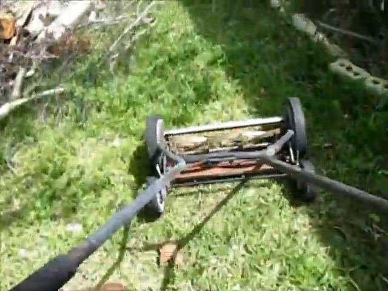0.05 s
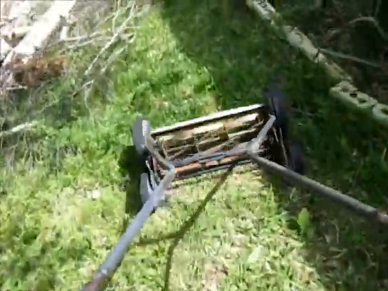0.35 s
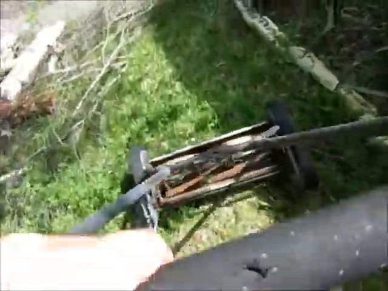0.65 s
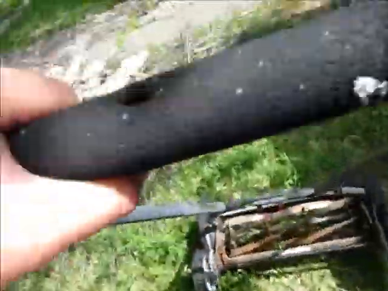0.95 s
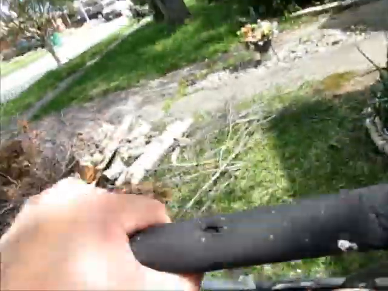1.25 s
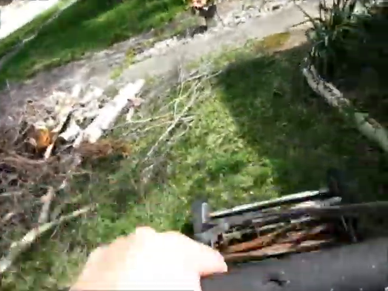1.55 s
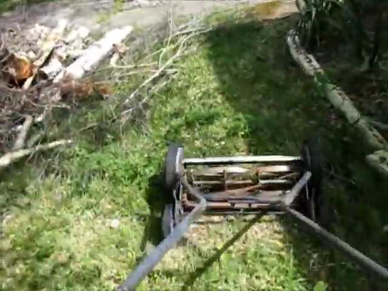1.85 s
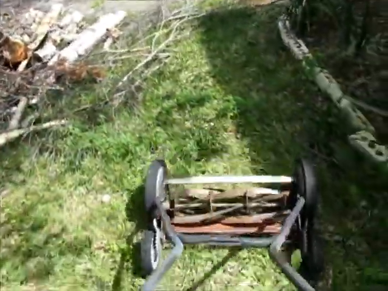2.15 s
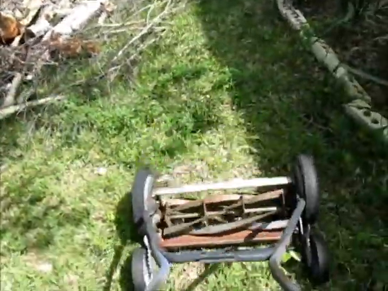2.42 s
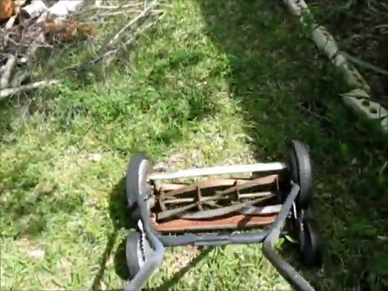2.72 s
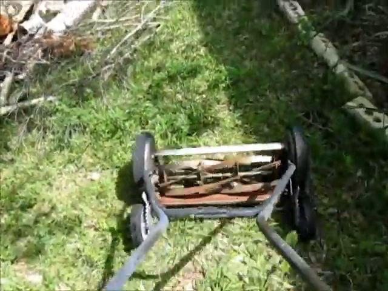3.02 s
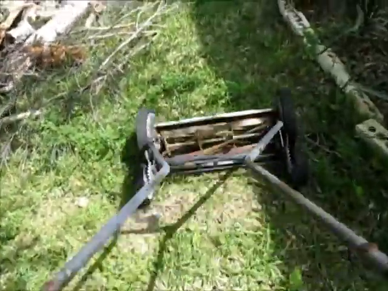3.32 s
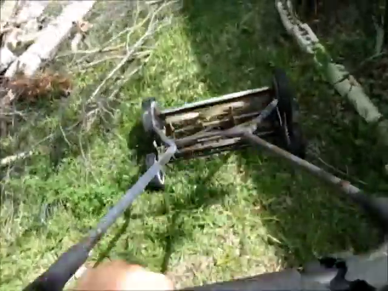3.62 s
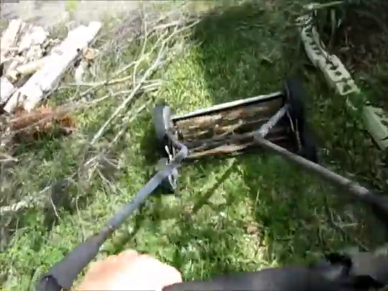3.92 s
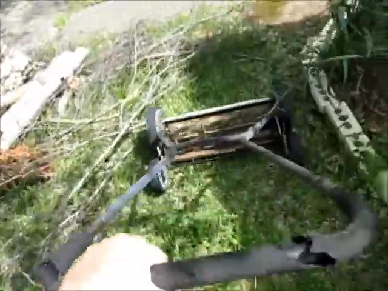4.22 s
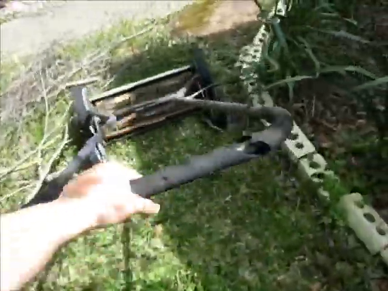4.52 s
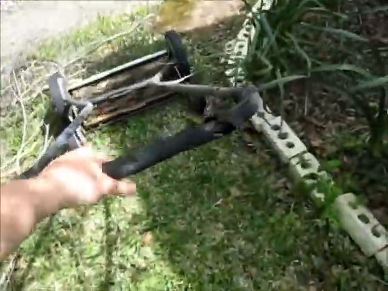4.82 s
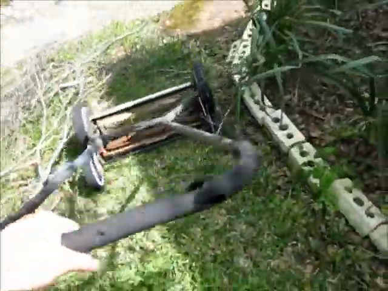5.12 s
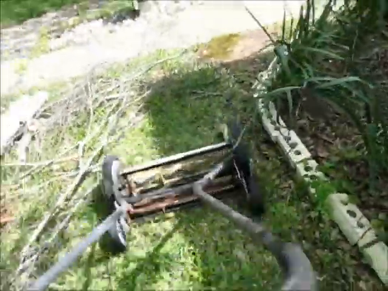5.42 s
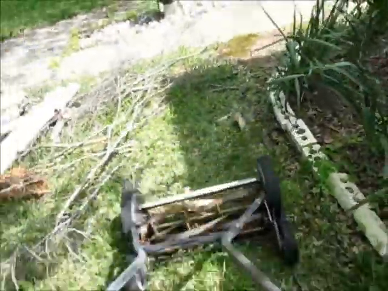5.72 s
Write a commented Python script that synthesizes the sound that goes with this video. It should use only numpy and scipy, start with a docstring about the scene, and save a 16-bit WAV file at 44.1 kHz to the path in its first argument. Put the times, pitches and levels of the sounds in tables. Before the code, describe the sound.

A hand-pushed reel mower rolls back and forth over a lawn, heard close from its handle. Its steel blades rattle and scrape, hissing through grass, while the loose handle clanks. After the first push it pauses; a faint bird whistles and a dry pivot squeaks once. More strokes follow with snapping stems and rumbling wheels, ending in quick bright metal clinks. Soft garden air and a light breeze lie underneath.

```python
"""A hand-pushed reel mower rattles and clanks back and forth over a lawn, heard from its handle.
The harder the push, the louder gears and blades rattle the steel frame and the reel hisses through grass.
The loose handle knocks, stems snap, the wheels hum over rough ground, and at speed one high blade
catches on the bed knife about once a turn. In a pause a small bird whistles, then a dry pivot squeaks.
Garden air and a light breeze lie underneath."""
import sys
import numpy as np
from scipy import signal
from scipy.fft import rfft, irfft, next_fast_len
from scipy.io import wavfile
from scipy.ndimage import map_coordinates

SR = 44100
rng = np.random.default_rng(int(sys.argv[2]) if len(sys.argv) > 2 else 0)


def store_wav(level_fs):
    """Save 16-bit WAV to argv[1]."""
    pcm = np.round(np.clip(np.atleast_2d(level_fs), -1, 1) * 32767)
    wavfile.write(sys.argv[1], SR, pcm.T.astype(np.int16))


N = 262836

# how hard the mower is pushed, stroke after stroke (time [s], effort [dB])
PUSH_EFFORT = [(0, -30.5), (0.1, -28.5), (0.38, -28), (0.5, -41.5), (0.641, -52.5), (1.15, -65.5),
               (1.42, -53.5), (1.6, -42), (1.78, -50), (1.872, -30), (1.949, -33.5), (2.28, -31.5),
               (2.55, -55), (2.7, -47.5), (3.1, -33.5), (3.34, -34.5), (3.48, -27.5), (3.85, -33),
               (4.13, -32), (4.44, -22.5), (4.61, -29.5), (4.7, -38), (4.9, -45.5), (5.2, -31),
               (5.651, -31.5), (5.96, -29)]
# modes of the steel frame and reel (frequency [Hz], level [dB], t60 [s])
FRAME_MODES = [(262, -16, 0.063), (333, -19.5, 0.052), (598, -11, 0.091), (864, -12, 0.077),
               (1013, -10.5, 0.12), (1107, -6, 0.13), (1143.6, -5.5, 0.31), (1178, -6, 0.12),
               (1306, -11.5, 0.082), (1427, -10.5, 0.054), (1930, -14, 0.06), (2445, -18.5, 0.2),
               (2890, -23.5, 0.2), (6440, -10.5, 0.054)]
# thick tufts that the reel shears (centre [s], length [s], hiss [dB])
GRASS_TUFTS = [(0.785, 0.22, -44.5), (1.53, 0.34, -50), (1.89, 0.36, -34), (2.42, 0.14, -43),
               (2.8, 0.2, -48), (3.9, 0.5, -35.5), (4.63, 0.095, -24.5), (4.98, 0.63, -43.5),
               (5.4, 1, -34.5)]
# loose handle joints striking (time [s], clash [dB], frame ring [dB], bright edge [dB], rise [s])
HANDLE_KNOCKS = [(0.339, -7, -17, -38, 0.01), (0.3704, -10.5, -29, -19, 0.0021),
                 (0.384, 1.5, -10, -13.5, 0.012), (0.4546, -9, -35, -22.5, 0.00054),
                 (0.478, -28, -27, -47, 0.0023), (0.5605, -10.5, -28, -42, 0.0043),
                 (1.5316, -16, -29, -52, 0.001), (1.5469, -8, -29, -42, 0.0027),
                 (1.5731, -32, -16.5, -55, 0.002), (1.6275, -8, -22, -33, 0.00043),
                 (1.647, -43, -19, -54, 0.002), (2.0024, -7, -24, -20.5, 0.0012),
                 (2.04, -7.5, -18.5, -19, 0.018), (2.105, -20, -21, -24.5, 0.0019),
                 (2.16, -13, -15.5, -21, 0.013), (2.2514, -10.5, -15, -34, 0.0028),
                 (2.264, -7, -15, -16, 0.0084), (2.3667, -21.5, -22, -26.5, 0.0013),
                 (2.38, -33, -18.5, -42, 0.003), (2.8351, -37, -26, -50, 0.002),
                 (2.8598, -30.5, -30, -47, 0.0012), (3.015, -17, -21, -49, 0.003),
                 (3.1762, -15.5, -19.5, -47, 0.0027), (3.2375, -5, -29, -15.5, 0.0015),
                 (3.5257, -13.5, -25, -39.5, 0.0029), (3.6228, -17, -20, -45, 0.0025),
                 (3.682, -5, -31, -20, 0.0051), (3.934, -10.5, -23, -19, 0.0082),
                 (4.29, -6.5, -15, -18.5, 0.0077), (4.3152, -27, -11.5, -39, 0.002),
                 (4.4586, -8.5, -13.5, -29.5, 0.0011), (4.4861, -18, -23.5, -17.5, 0.0034),
                 (4.562, -13.5, -15, -20.5, 0.002), (4.8321, -33, -33, -40, 0.0015),
                 (5.0897, -16.5, -19, -23.5, 0.0026)]
# the high blade catching the bed knife (time [s], level [dB])
BLADE_CATCHES = [(0.046, -19), (0.137, -14), (0.203, -15), (5.189, -8.5), (5.262, -11.5), (5.375, -9),
                 (5.436, -8), (5.532, -12.5), (5.605, -6.5), (5.686, -9.5), (5.7, -10), (5.756, -7.5),
                 (5.776, -13.5), (5.844, -8.5), (5.933, -9)]
# rough ground that sets the wheels humming (centre [s], length [s], hum [dB])
GROUND_BUMPS = [(0.2, 0.52, -37.5), (3.18, 0.19, -35.5), (3.55, 0.37, -34.5), (4.26, 0.25, -29)]
# stems and twigs snapping between the blades (time [s], level [dB])
STEM_SNAPS = [(0.879, -28), (2.185, -22), (2.6533, -7.5), (3.5987, -17), (3.9672, -10.5), (4.007, -8),
              (4.562, -14), (4.619, -7), (4.6448, -10), (4.7088, -14.5), (5.3645, -8)]
# the dry pivot's squeak (time [s], pitch [Hz], level [dB])
PIVOT_GLIDE = [(1.425, 708, -79), (1.443, 703, -38.5), (1.466, 713, -24), (1.488, 710, -23.5),
               (1.503, 720, -30), (1.52, 690, -44)]
# its harmonics (multiple of the pitch, level [dB])
PIVOT_HARMONICS = [(1, -1), (2, -5.5), (3, -18), (4, -14.5), (5, -9.5), (6, -14), (7, -22.5), (8, -22),
                   (9, -21), (10, -27)]
# the bird's call (time [s], length [s], start pitch [Hz], end pitch [Hz], level [dB])
BIRD_WHISTLES = [(1.02, .085, 4750, 3900, -54), (1.09, .055, 3900, 3350, -57),
                 (1.215, .04, 5100, 4850, -57), (1.23, .09, 4580, 4120, -52), (1.255, .06, 3480, 3620, -54)]
# gusts of the breeze (time [s], level [dB])
BREEZE_GUSTS = [(0.0, -44), (0.18, -39), (0.5, -67), (1.15, -49), (2.55, -45), (2.9, -56.5), (4.05, -54),
                (4.75, -69), (5.5, -39.5), (5.96, -50)]

# noise colours (frequency [Hz], spectral density [dB])
KNIFE_COLOUR = [(150, -65), (350, -13), (480, -6), (620, 7), (850, 4.5), (1450, 6), (2100, -0.5),
                (3300, -0.5), (4400, -5), (5400, -1), (6600, -6.5), (8500, -4), (10500, -14.5),
                (16000, -8.5)]  # blades scraping the bed knife
GRASS_COLOUR = [(1000, -12), (4000, 1.5), (6500, 7.5), (9000, 2), (10400, 0.5), (12500, 5), (15000, 4),
                (16000, -7)]  # airy hiss of shearing
CLASH_COLOUR = [(100, -22), (280, 0), (450, 0.5), (600, 0.5), (900, -0.5), (1450, 6), (2100, -0.5),
                (2600, 1.5), (3500, 2), (4500, -2.5), (6500, -2.5), (8500, -16.5), (10500, -28),
                (16000, -35)]  # body of a steel clank
HANDLE_EDGE_COLOUR = [(2500, -27), (4600, 8), (5350, 14.5), (5900, 6), (6500, 12), (8500, 7.5), (10500, -1),
                      (13200, 2), (14800, -9), (16000, -33)]  # bright edge of a handle knock
BLADE_EDGE_COLOUR = [(2500, -37), (4500, -4), (5350, 16), (6000, 8), (6500, 4.5), (8500, 7.5), (10500, -3),
                     (12500, 5.5), (14800, 7.5), (16000, 7.5)]  # bright edge of a caught blade
RUMBLE_COLOUR = [(40, -26), (100, -22), (140, -14.5), (205, -10), (240, -0.5), (263, 0), (300, 0),
                 (420, -5.5), (900, -10), (3000, -46)]  # rolling wheels
TYRE_COLOUR = [(60, -24), (150, -16.5), (232, -13), (264, 7.5), (292, -12.5), (420, -15.5), (900, -12),
               (2500, -60)]  # hollow note of a wheel
CRACK_COLOUR = [(500, 4), (1200, 3), (2200, 4.5), (4000, -2), (6500, 7), (11000, 0.5), (15000, 8.5)]  # a breaking stem
AIR_COLOUR = [(40, -12), (80, -3), (170, -3), (280, -5.5), (450, -7), (700, -5.5), (1200, -9),
              (2200, -21.5), (4000, -25.5), (7000, -28), (15500, -32.5)]  # outdoor air
BREEZE_COLOUR = [(12, -31), (25, -20), (45, -4), (72, 1.5), (110, -7), (250, -11.5), (600, -38)]  # low wind buffeting

# stereo widths (frequency [Hz], side minus mid [dB])
MOWER_WIDTH = [(40, -10), (170, -25), (380, -32), (550, 0.5), (800, -17.5), (1100, -6.5), (1500, -8),
               (2000, -15), (3000, -3.5), (7000, -9.5), (14000, -6.5)]  # reel, wheels and stems
CLANK_WIDTH = [(100, -12), (350, -31), (550, -14), (800, -21), (1300, -13), (2000, -15), (3300, -6.5),
               (5000, -12), (8500, -12), (14000, -11)]  # clashing steel
GARDEN_WIDTH = [(80, -20), (200, -20), (600, -9), (1200, -6), (2200, -2), (4000, 5), (15000, 3)]  # outdoor air
BREEZE_WIDTH = [(30, 0.39), (200, 0.23)]  # wind buffeting
# how the mower's tone leans between the ears (frequency [Hz], left minus right [dB])
MOWER_LEAN = [(60, -1), (110, -6), (200, -1.0), (380, -2.5), (700, -4), (1290, -2.5), (2380, -3.5),
              (4400, -4.5), (8120, 0), (15000, 0)]
# the mower's sideways swing, taken about its mean (time [s], left minus right [dB])
MOWER_SWING = [(0.0, -7), (0.9, -8.5), (1.25, -19), (1.55, -9), (4.86, -6), (5.96, -8)]


def reel(top_passes_per_s=85, rattle_db=1.0, scrape_db=1.5, hiss_db=-3, tuft_db=2, crackle=0.47, grit=0.18):
    """Blades and gear teeth rattle the frame; each pass scrapes the bed knife and shears grass."""
    effort, = curves(PUSH_EFFORT)
    speed = amp(0.4 * (np.maximum(effort, -55) - effort.max()))  # share of the top reel speed
    passes = blade_passes(top_passes_per_s * speed, spread_db=2.6)
    whirr = unit(3.1 + bursts(passes, t60=0.08))  # a steady rub with a pulse on each pass
    stems = bursts(contacts(rate=150, scatter=1, spread_db=5.5), t60=0.006)
    nicks = bursts(contacts(rate=110, scatter=1, spread_db=4), t60=0.012)
    rattle = amp(rattle_db) * push_gain(1.13) * unit(frame_ring(passes, damping=47))
    scrape_gain = amp(effort + scrape_db + 1.87 * wobble(25))
    scrape = scrape_gain * unit(whirr + grit * nicks) * noise(KNIFE_COLOUR, MOWER_WIDTH)
    hiss_gain = np.hypot(amp(hiss_db) * push_gain(0.99), amp(tuft_db) * swells(GRASS_TUFTS))
    hiss_gain *= amp(1.2 * wobble(40))
    hiss = hiss_gain * unit(whirr + crackle * stems) * noise(GRASS_COLOUR, MOWER_WIDTH)
    return rattle + scrape + hiss


def blade_passes(rate, spread_db):
    """An uneven blow each time the reel moves on by one blade: rows (time [s], strength [gain])."""
    blades_passed = np.cumsum(rate) / SR
    k = np.arange(int(blades_passed[-1]))
    late, hard = rng.standard_normal((len(k), 2)).T
    times = np.interp(k + 0.2 * late, blades_passed, np.arange(N) / SR)
    return np.column_stack([times, amp(spread_db * np.clip(hard, -2, 2))])


def push_gain(slope):
    """Gain that rides the push, moving slope dB for each dB of effort about its median."""
    effort, = curves(PUSH_EFFORT)
    usual = np.median(effort)
    return amp(usual + slope * (effort - usual))


def frame_ring(blows, damping, vary_db=2, width=0.069):
    """Each blow rings the frame's modes at new strengths; high modes spread wider in stereo."""
    hz, db, t60 = np.transpose(FRAME_MODES)
    t, out = np.arange(SR // 4) / SR, np.zeros((2, N))
    attack = 1 - np.exp(-t / 0.00075)
    modes = attack * np.exp((2j * np.pi * hz - np.log(1000) / t60)[:, None] * t)
    modes = np.vstack([modes.real, modes.imag])
    times, effort = np.transpose(PUSH_EFFORT)
    for s, strength in blows:
        levels = amp(db + vary_db * rng.standard_normal(len(hz)))
        mid, side = np.exp(2j * np.pi * rng.random((2, len(hz))))
        side = side * np.minimum(width * hz / 1500, 0.7)
        ears = levels * np.array([mid + side, mid - side])
        ring = np.hstack([ears.real, ears.imag]) @ modes
        rubbing = amp(np.interp(s, times, effort) - effort.max())  # blades on the knife damp the frame
        add(out, s, strength * np.exp(-damping * rubbing * t) * ring)
    return out


def handle():
    """The handle knocks in its joints when the push changes or the mower jolts."""
    return clanks(HANDLE_KNOCKS, HANDLE_EDGE_COLOUR, width_db=6.5)


def high_blade(ring_db=-7, edge_db=-7, rise_s=0.0072):
    """One high blade catches the bed knife: the same kind of bright clank, harder or softer."""
    blows = [(s, db, db + ring_db, db + edge_db, rise_s) for s, db in BLADE_CATCHES]
    return clanks(blows, BLADE_EDGE_COLOUR, width_db=-4)


def clanks(blows, edge_colour, width_db, t60=0.1, clash_db=-10, ring_db=-1, edge_db=-2):
    """Loose steel starts to rattle, strikes hard, chatters in a short clash, and the frame rings on."""
    t, out = np.arange(-SR // 25, SR // 4) / SR, np.zeros((2, N))
    after = np.maximum(t, 0)
    pre_rattle = amp(-16.5) * np.exp(-np.abs(t) / 0.016)  # swells into the strike
    decay = fade(after, t60) + 0.77 * fade(after, 0.033)  # body plus a short punch
    chatter = unit(amp(0.24 * wobble(300)))
    padding = ((0, 0), (0, len(t)))
    clash = np.pad(chatter * noise(CLASH_COLOUR, CLANK_WIDTH), padding)
    edge = np.pad(chatter * noise(edge_colour, CLANK_WIDTH), padding)
    for s, db, _, bright_db, rise_s in blows:
        span = round((s + t[0]) * SR) + np.arange(len(t))
        steel = amp(db + clash_db) * clash[:, span] + amp(bright_db + edge_db) * edge[:, span]
        steel = steel_resonances(steel, depth_db=4.0)
        mid = steel.mean(axis=0)
        envelope = pre_rattle + decay * (1 - np.exp(-after / rise_s))
        add(out, s + t[0], envelope * (mid + amp(width_db) * (steel - mid)))
    return out + frame_ring([(s, amp(db + ring_db)) for s, _, db, _, _ in blows], damping=23)


def steel_resonances(x, depth_db):
    """Each contact point favours its own narrow steel resonances."""
    spectrum = rfft(x)
    ripple = signal.fftconvolve(rng.standard_normal(spectrum.shape[-1]), np.hanning(81), "same")
    peaks = amp(depth_db * unit(ripple))
    return irfft(spectrum * unit(peaks), x.shape[-1])


def wheels(rumble_db=-12, hum_db=-1):
    """The wheels rumble with the push and hum a hollow note over rough ground."""
    rumble = amp(rumble_db + 0.5 * wobble(22)) * push_gain(0.78) * noise(RUMBLE_COLOUR, MOWER_WIDTH)
    hum = amp(hum_db) * swells(GROUND_BUMPS) * noise(TYRE_COLOUR, MOWER_WIDTH)
    return rumble + hum


def stem_snaps(snap_db=-1, tail_db=-28, ring_db=-22):
    """A stem breaks with a bright crack that jolts the reel."""
    envelope, t = np.zeros(N), np.arange(SR // 10) / SR
    for s, db in STEM_SNAPS:
        add(envelope, s, amp(db + snap_db) * (fade(t, 0.0093) + amp(tail_db) * fade(t, 0.29)))
    cracks = envelope * noise(CRACK_COLOUR, MOWER_WIDTH)
    return cracks + frame_ring([(s, amp(db + ring_db)) for s, db in STEM_SNAPS], damping=47)


def pivot_squeak(brighten=0.14, jitter=0.02, rough_db=3):
    """Stick-slip in the dry pivot: its fluttering overtones grow as it is pressed harder."""
    pitch, db = curves(PIVOT_GLIDE)
    t, tone = np.arange(N) / SR, np.zeros(N)
    phase = 2 * np.pi * np.cumsum(pitch * (1 + jitter * wobble(400))) / SR
    for k, level in PIVOT_HARMONICS:
        flutter = rough_db * np.log10(k) * wobble(150)
        tilt = brighten * (k - 5) * (db - db.max())
        tone += amp(level + flutter + tilt) * np.sin(k * phase + 2 * np.pi * rng.random())
    gate = (t > PIVOT_GLIDE[0][0]) & (t < PIVOT_GLIDE[-1][0])
    return amp(db) * tone * gate


def bird():
    """A distant bird's slurred whistles; paths through the trees make them flutter."""
    call = np.zeros(N)
    for s, length, start_hz, end_hz, db in BIRD_WHISTLES:
        glide = np.linspace(start_hz, end_hz, int(length * SR))
        whistle = np.sin(2 * np.pi * np.cumsum(glide) / SR)
        add(call, s, amp(db) * signal.windows.tukey(len(glide)) * whistle)
    return call * (0.5 + 0.71 * np.array([wobble(170), wobble(150)]))


def garden_air(air_db=-47, breeze_db=-3):
    """A soft bed of outdoor air, with the low buffeting of a light breeze."""
    gust_db, = curves(BREEZE_GUSTS)
    air = amp(air_db + 2.0 * wobble(3.61)) * noise(AIR_COLOUR, GARDEN_WIDTH)
    return air + amp(gust_db + breeze_db) * noise(BREEZE_COLOUR, BREEZE_WIDTH)


def contacts(rate, scatter, spread_db):
    """Uneven blows, rate a second: rows (time [s], strength [gain])."""
    k = np.arange(int(rate * N / SR))
    late, hard = rng.standard_normal((len(k), 2)).T
    return np.column_stack([(k + scatter * late) / rate, amp(spread_db * np.clip(hard, -2, 2))])


def bursts(blows, t60):
    """Envelope of rms 1: every blow starts at once and dies away."""
    envelope, t = np.zeros(N), np.arange(SR // 16) / SR
    for s, strength in blows:
        add(envelope, s, strength * fade(t, t60))
    return unit(envelope)


def swells(rows):
    """Gain that rises and falls once for each row (centre [s], length [s], level [dB])."""
    gain = np.zeros(N)
    for s, length, db in rows:
        add(gain, s - length / 2, amp(db) * np.hanning(int(length * SR)))
    return gain


def noise(colour, width):
    """Coloured stereo noise of rms 1, partly alike in both ears."""
    white = rng.standard_normal((2, N))
    mid, side = filtered(white, lambda hz: amp(along(colour, hz) + [0 * hz, along(width, hz)]))
    return unit(np.array([mid + side, mid - side]))


def filtered(x, response):
    """EQ x with a response given as a function of frequency."""
    size = next_fast_len(N + 8192)
    return irfft(rfft(x, size) * response(np.fft.rfftfreq(size, 1 / SR)), size)[..., :N]


def along(points, hz):
    """Read (frequency [Hz], value) points along a log frequency axis."""
    f, v = np.transpose(points)
    return np.interp(np.log(hz + 1), np.log(f + 1), v)


def curves(rows):
    """One automation curve for each column after the time."""
    s, *columns = np.transpose(rows)
    return [np.interp(np.arange(N) / SR, s, column) for column in columns]


def wobble(rate):
    """A smooth random curve, rate knots a second."""
    return map_coordinates(rng.standard_normal(int(N * rate / SR) + 4), [np.arange(N) * rate / SR])


def fade(t, t60):
    """Exponential decay, 60 dB in t60 seconds."""
    return np.exp(-np.log(1000) * t / t60)


def add(track, s, sound):
    """Mix a sound into a track at time s."""
    start = max(round(s * SR), 0)
    part = track[..., start:start + sound.shape[-1]]
    part += sound[..., :part.shape[-1]]


def amp(db):
    """Decibels to gain."""
    return 10 ** (np.asarray(db) / 20)


def unit(x):
    """Scale to rms 1."""
    return x / np.sqrt(np.mean(x ** 2) + 1e-20)


def scene():
    """The mower swings a little from side to side in the open garden."""
    ears = np.array([[0.5], [-0.5]])
    swing_db, = curves(MOWER_SWING)
    mower = reel() + wheels() + handle() + high_blade() + stem_snaps() + pivot_squeak()
    mower = filtered(mower, lambda hz: amp(ears * along(MOWER_LEAN, hz)))
    return mower * amp(ears * (swing_db - swing_db.mean())) + bird() + garden_air()


def record(dry, notch_hz=7900, notch_width_hz=130, top_hz=15950):
    """Master EQ: a narrow treble notch and a steep high cut."""
    notch = lambda hz: (notch_hz ** 2 - hz ** 2) / (notch_hz ** 2 - hz ** 2 + 2j * hz * notch_width_hz)
    return filtered(dry, lambda hz: notch(hz) * (hz < top_hz))


dry = scene()
out = record(dry)
store_wav(out)
```